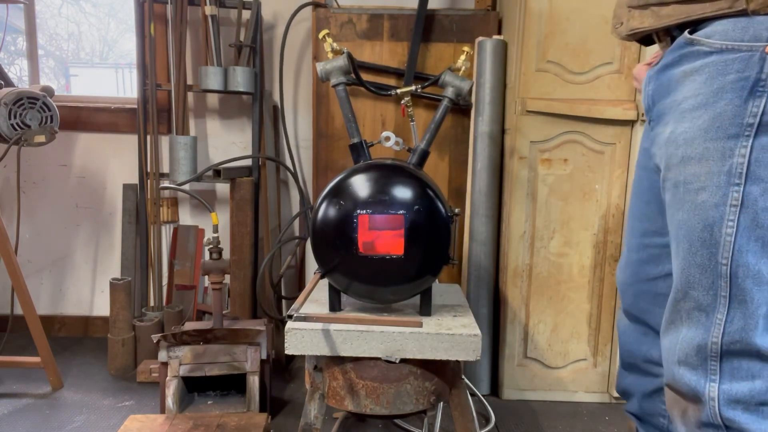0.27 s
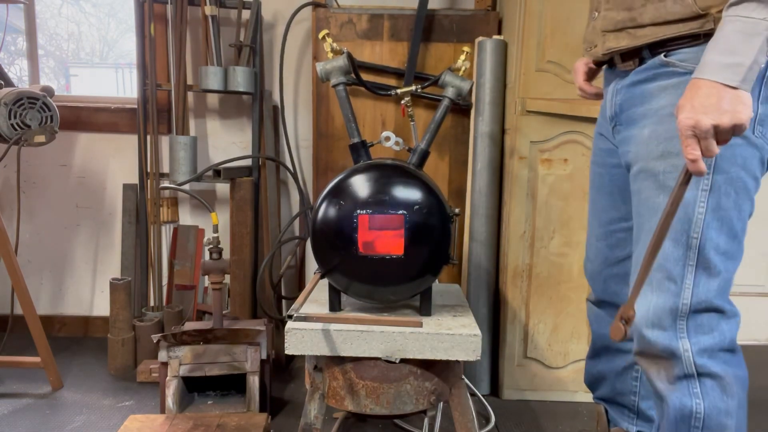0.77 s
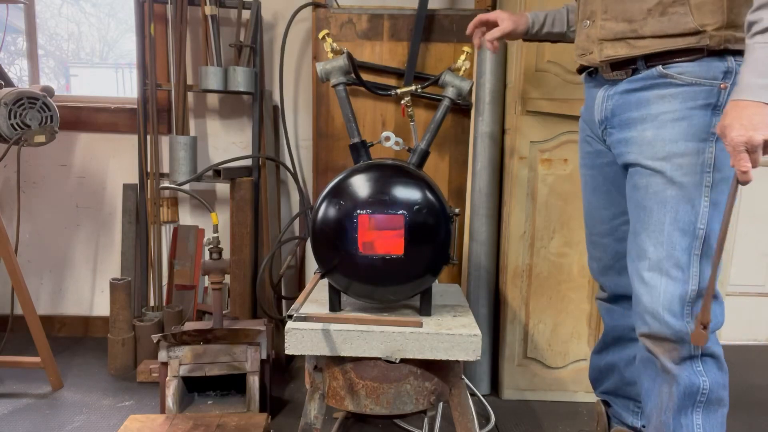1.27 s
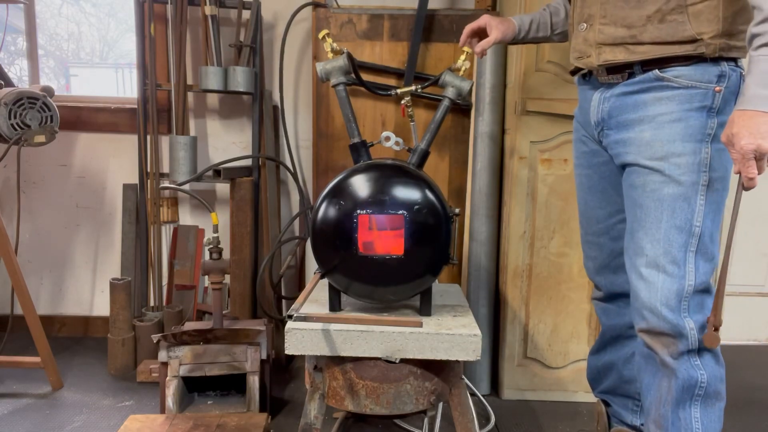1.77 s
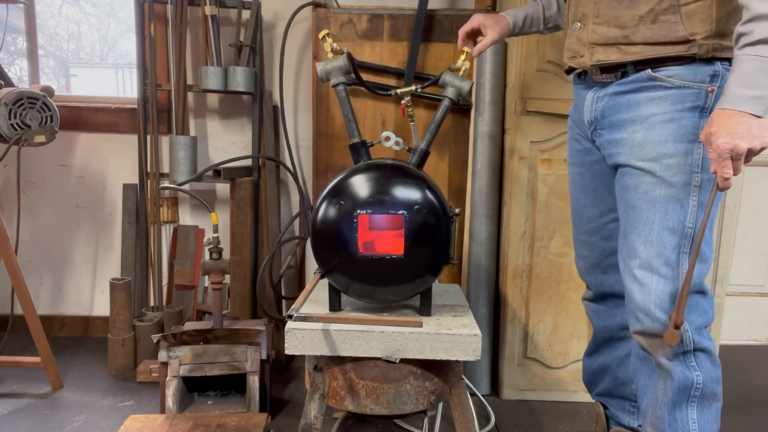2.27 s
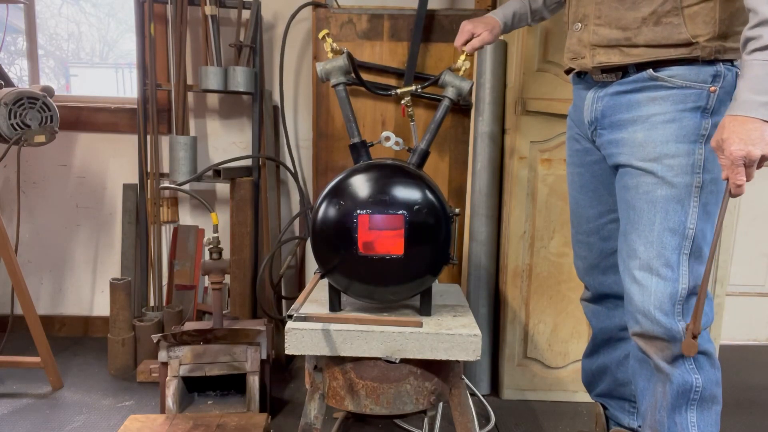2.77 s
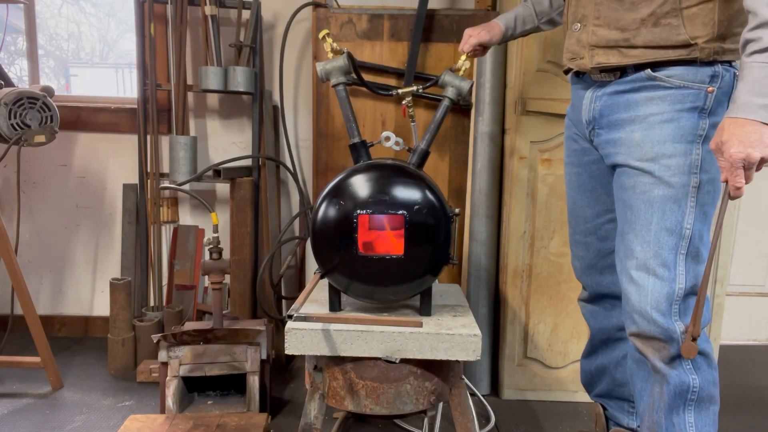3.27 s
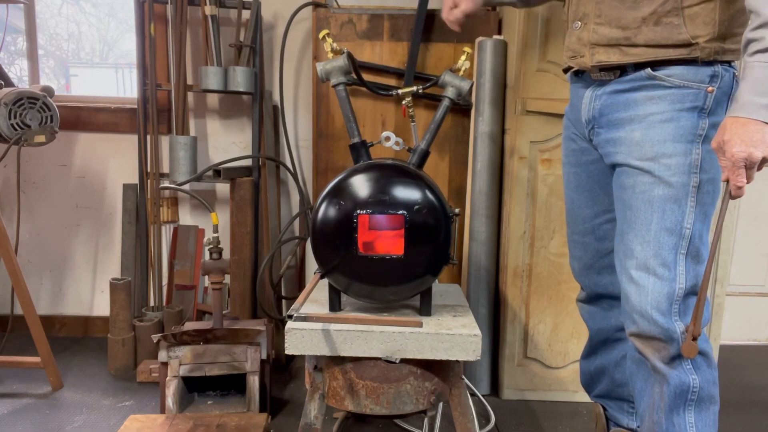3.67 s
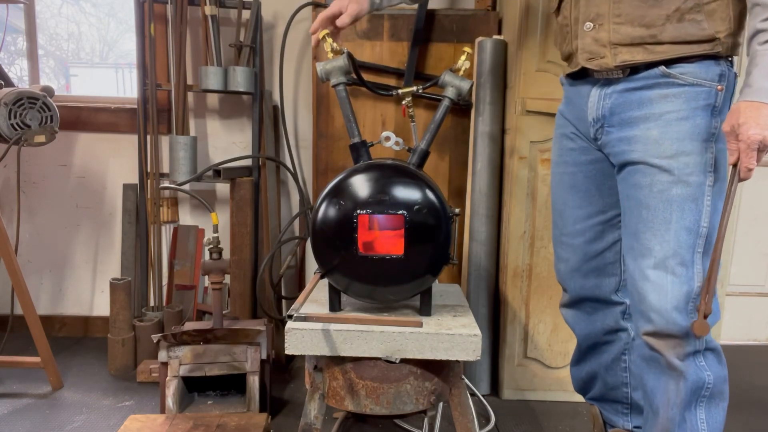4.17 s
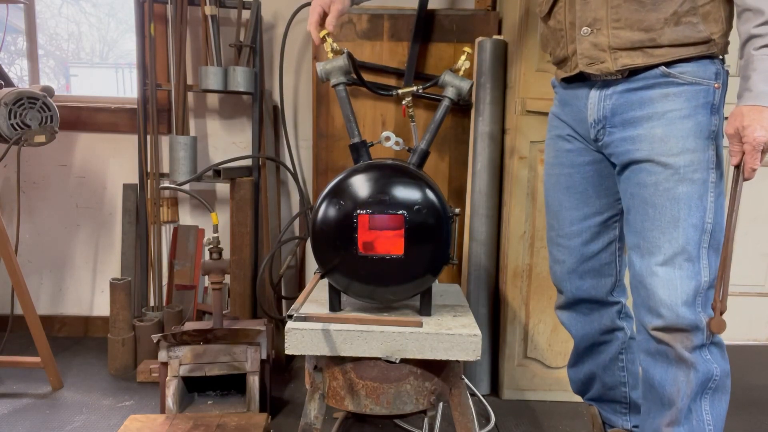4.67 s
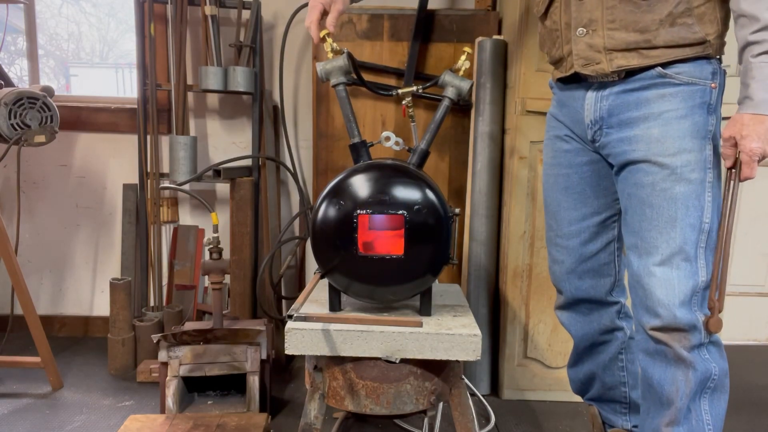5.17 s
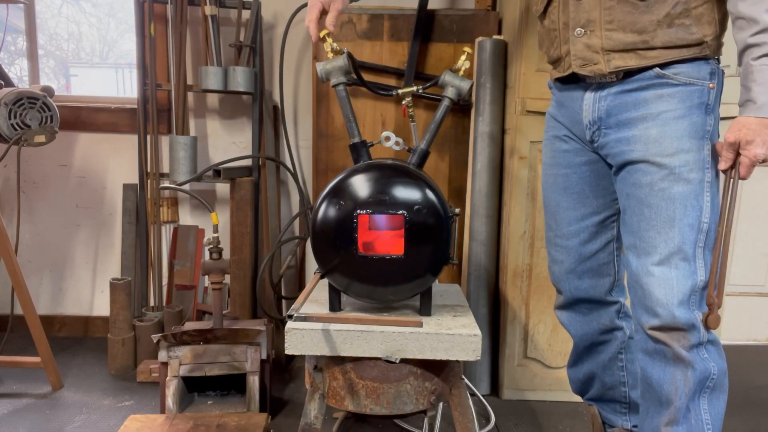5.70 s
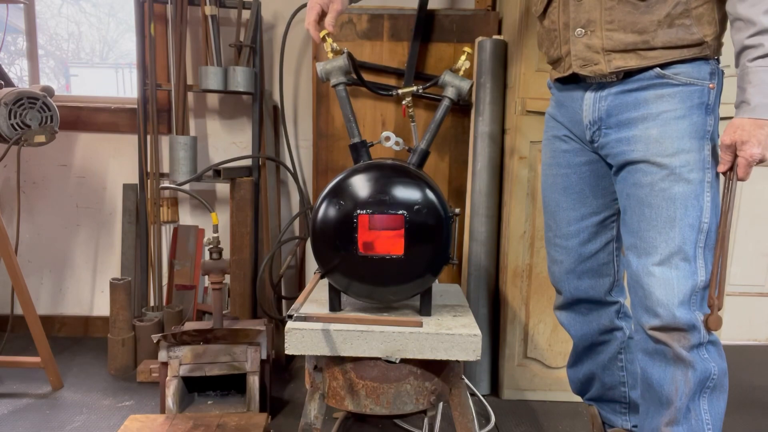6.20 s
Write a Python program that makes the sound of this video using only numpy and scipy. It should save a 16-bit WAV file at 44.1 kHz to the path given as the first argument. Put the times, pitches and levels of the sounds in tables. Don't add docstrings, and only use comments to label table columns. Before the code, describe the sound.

From 0 to about 6.4 seconds a two-burner gas forge burns without pause in a small workshop, heard close in stereo. The main sound is a deep, wide, fluttering roar, strongest between roughly 200 and 400 hertz, with little treble. It holds nearly level, but quick gusts and dips, each under a tenth of a second, make it wobble and puff. Much quieter above it are breathy tube resonances around 1.5 to 3.5 kilohertz and a fine, wide gas hiss. Brief, faint whistles appear near 1.6, 2.5 and 2.65 seconds, then a low upward slide at 2.8. At 2.74 the tube tone changes suddenly as the right air choke turns; very faint high whistles follow at 3.7 and 4.3. Around 4.1 the left choke changes the colour again, and the hiss becomes slightly brighter and ringing. The roar fades slightly around 4 to 4.5, recovers, and continues to the end.

```python
import sys
import numpy as np
from scipy import signal
from scipy.fft import rfft, irfft, next_fast_len
from scipy.io import wavfile
from scipy.ndimage import uniform_filter1d

SR = 44100
rng = np.random.default_rng(int(sys.argv[2]) if len(sys.argv) > 2 else 0)


def makeup_ratio(level_db):
    decades = np.asarray(level_db, float) / 20
    return 10 ** decades


def pcm_store(signal):
    levels = np.round(np.clip(np.atleast_2d(signal), -1, 1) * 32767)
    wavfile.write(sys.argv[1], SR, levels.astype(np.int16).T)


N = 283915

# f/Hz, level/dB
TURBULENCE = [(25, -81), (45, -81), (100, -58.5), (330, -50.5), (600, -64.5), (1000, -84.5), (1300, -108)]
# f/Hz, width/Hz, signed share at left port, at right port
ROOM_MODES = [(47.7, 7.2, 1.66, 1.6), (66.0, 9.6, 0.36, 0.55), (103.6, 18, -1.13, -1.1),
              (129.1, 13, -1.56, -1.28), (142.8, 14.4, 1.35, 1.7), (166.7, 22.5, 0.62, 0.3),
              (233.7, 21.7, 4.5, 4.5), (240.14, 62.1, -4.5, -4.5), (254.8, 48.5, 3, 3),
              (282.5, 13.8, -0.49, -1.48), (314.2, 29.4, 2, 1.87), (336.9, 9.4, -2, -1.37),
              (350, 13, -0.82, -0.4), (368.8, 21.3, -0.59, -0.64), (405.9, 16, 1, 2.5),
              (411, 27.8, -0.35, -3), (444.7, 22, 1.05, 0.92), (471, 28.2, -1.26, -0.64),
              (501, 38, -1.5, -0.36), (528.3, 61, 5, 2.5), (531, 34.7, -4.5, -3), (551.7, 25, -1.35, -0.36),
              (627.4, 34.5, -1.27, -1.04), (635, 55, 1.38, 1.19), (716, 9.1, 0.26, 0.35),
              (766.6, 35, 0, 1.6), (813.2, 16.7, -6, -2.5), (810.8, 40, 3.5, -0.1), (884, 19, 1, 1),
              (921, 43, 0.42, 2)]
# f/Hz, level/dB
SPREAD = [(24, -70), (40, -36), (179, -15.5), (226, 6.5), (275, -2), (307, 7.5), (423, -7.5), (466, -16),
          (716, -20), (811, -14), (1100, -36), (1430, -70), (2420, -120)]
RANGE_EDGES = [170, 255, 420, 700]
# level/dB against flame strength, share of its changes followed, share of air followed
RANGES = [(-10, 0.36, -0.065), (-7, 1, -0.49), (-2.5, 1.1, 0.078), (-13.5, .6, 0.88), (-29.5, 0.27, -0.24)]
# t/s, level/dB
FIRE = [
    (0.0, -26),
    (0.66, -27.5),
    (0.7, -25),
    (0.88, -26.5),
    (3.98, -28),
    (4.46, -26),
    (5.18, -27.5),
    (5.61, -25.5),
    (5.67, -27.5),
    (6.44, -26),
]
# t/s,
# level/dB
AIR = [(0, 0.5), (.8, .3), (1.3, 1.6), (2.1, 2.5), (2.55, 3.5), (2.7, 0.9), (3.6, -1.6), (4.4, 0.2),
       (5.2, -1.5), (6.0, -2.3), (6.44, 0.7)]
# t/s, nearby f/Hz, level/dB
FLARES = [(.02, 330, 7.5), (.59, 230, 4), (.72, 230, 5.5), (.72, 130, 2.5), (.82, 230, 3), (.82, 130, 4),
          (.91, 130, 4), (1.24, 230, 5), (1.38, 130, 4), (1.45, 230, 8), (2.06, 130, 6.5), (2.17, 520, 2),
          (2.4, 330, 8), (2.63, 130, 3), (3.26, 330, 5), (3.32, 130, 3), (3.51, 130, 2.5), (3.57, 230, 4),
          (4.25, 230, 6), (4.34, 330, 3), (4.43, 230, 6), (4.48, 130, 3), (4.7, 330, 3.5), (4.82, 230, 2.5),
          (5.12, 130, 5), (5.15, 230, 5), (5.29, 230, 4), (5.45, 230, 4), (5.81, 230, 6), (6.22, 330, 2)]
# t/s, nearby f/Hz, level/dB
LULLS = [(.01, 230, -11), (.54, 230, -6), (.66, 130, -2), (.77, 230, -7), (.88, 130, -7), (.97, 230, -10),
         (1.38, 330, -4), (1.67, 230, 1), (2.17, 330, -2), (2.3, 130, 0), (2.54, 130, -10),
         (2.63, 520, -2.5), (3.06, 230, -10), (3.17, 520, -2.5), (3.26, 130, -5), (3.32, 330, -3.5),
         (3.51, 230, -5), (3.57, 130, -1), (4.25, 330, -4), (4.34, 230, -6), (4.65, 130, -5),
         (4.72, 230, -9), (4.96, 330, -5.5), (5.15, 330, -2), (5.22, 130, -5), (5.61, 130, -4.5),
         (5.74, 330, -6.5), (5.87, 330, -2.5), (5.99, 330, -7.5), (6.22, 130, -5)]
# from t/s, to t/s
CHOKE_TURNS = [
    (2.74, 2.74),
    (4.1, 4.2),
]
# f/Hz, width/Hz, level/dB at first, level/dB after right choke, level/dB after left choke
TUBE_MODES = [(1000, 160, -15, -29, -35), (1215, 130, -14.5, -21, -17), (1388, 74, -13, -6, -5),
              (1462, 71, -1.5, -2.5, .8), (1560, 80, -8, -3, -6.5), (1880, 83, -3, -7.5, -4),
              (1992, 173, -5, -8, -7), (2435, 80, -4, 1.2, .2), (2580, 120, -9.5, -11, -12),
              (2870, 73, -18, -12, -10), (2985, 67, -7.5, -8.5, -8), (3055, 110, -6, -13, -13),
              (3174, 41, -9.5, -8.5, -5.5),
              (3545, 110, -6.5, -17, -10.5), (3620, 80, -14.5, -9, -8.5), (3710, 57, -7, -19, -22),
              (4100, 80, -15, -30, -19), (4235, 110, -11, -15, -11), (4930, 74, -13.5, -16, -13),
              (5100, 80, -23, -23, -31), (5640, 77, -21, -27, -12.5), (5700, 110, -18.5, -17.5, -18.5),
              (6200, 120, -24, -20, -20), (6420, 120, -16, -22, -17.5), (7060, 60, -24, -29, -27),
              (6960, 50, -18, -25, -22)]
# t/s, length/s, from f/Hz, to f/Hz, level/dB
WHISTLES = [
    (1.56, 0.06, 1875, 1895, -54),
    (2.52, 0.043, 1850, 1840, -56),
    (2.635, 0.066, 1870, 1870, -51.5),
    (2.776, 0.048, 1085, 1250, -61.5),
    (3.66, .12, 4915, 4925, -67),
    (3.66, .09, 5700, 5700, -72),
    (4.26, 0.11, 4930, 4925, -69),
]
# f/Hz, level/dB
HISS = [(600, -15), (1100, 2.5), (2500, 8), (4000, 7), (5500, 1.5), (6700, 0), (7900, 4), (9000, 3),
        (12000, -1.5), (14500, -1.5), (16000, -5.5)]
# f/Hz, likeness 0-1, lead of the right port/rad
PORTS = [(1000, .5, 0), (4000, .3, 1.2), (5300, .3, 3), (6500, .45, 3.1), (7100, .83, 3.1), (8000, .82, 3),
         (8800, .74, 2.2), (9600, .75, 1.4), (10400, .82, .7), (11100, .95, .15), (13400, .97, -.1),
         (14000, .82, -.6), (15000, .62, -1.7), (15800, .5, -2.7)]
# f/Hz, width/Hz, level/dB
NOZZLE = [(9140, 250, 2), (9500, 230, 3), (12550, 410, 4)]

FIRE_MEAN_DB = -27
FLARE_S, LULL_S = 0.035, 0.042


def flame():
    size = next_fast_len(N)
    f = np.fft.rfftfreq(size, 1 / SR)
    turbulence, other = rfft(rng.standard_normal((2, size)))

    hz, width, left, right = np.transpose(ROOM_MODES)
    low = f[f < 1500, None]
    modes = 1j * low * width / (hz ** 2 - low ** 2 + 1j * low * width)
    heard = np.zeros((2, len(f)), complex)
    heard[:, :len(low)] = [modes @ left - 0.02, modes @ right - 0.02]
    heard *= turbulence * makeup_ratio(read(TURBULENCE, f))
    heard[0] *= np.exp(-2j * np.pi * f * 4.1 / SR)
    heard /= np.sqrt(np.mean(abs(heard) ** 2))

    unlike = other * makeup_ratio(read(SPREAD, f))
    unlike /= np.sqrt(np.mean(abs(unlike) ** 2))
    heard += makeup_ratio(-15) * unlike * [[1], [-1]]

    below = [0] + [1 / (1 + (f / edge) ** 16) for edge in RANGE_EDGES] + [1]
    roar = np.zeros((2, N))
    for k in range(len(RANGES)):
        part = irfft(heard * (below[k + 1] - below[k]), size)[:, :N]
        roar += makeup_ratio(swell(k)) * steadied(part, 0.17)
    return roar


def swell(count):
    offset_db, fire, air = RANGES[count]
    steady = FIRE_MEAN_DB + offset_db + fire * (along(FIRE) - FIRE_MEAN_DB) + air * along(AIR)
    return steady + bumps(FLARES, FLARE_S, count) + bumps(LULLS, LULL_S, count)


def bumps(rows, half_s, count):
    t = np.arange(0, N + 256, 256) / SR
    s, hz, db = np.transpose(rows)
    mine = np.searchsorted(RANGE_EDGES, hz) == count
    bells = np.exp(-((t[:, None] - s) / half_s) ** 2)
    return np.interp(np.arange(N) / SR, t, bells @ (db * mine))


def tubes():
    frames, f = N // 256 + 9, np.fft.rfftfreq(2048, 1 / SR)
    t = np.arange(frames)[:, None] * 256 / SR
    hz, width, first, second, third = np.transpose(np.array(TUBE_MODES))
    right, left = (np.clip((t - a) / (b - a), 0, 1) for a, b in CHOKE_TURNS)
    level_db = first + right * (second - first) + left * (third - second)
    flutter = np.clip(drift(level_db.shape, size=9), -3, 2)
    level_db = level_db + (2.0 + hz / 5000) * flutter
    peaks = 1 / (1 + (2 * (f - hz[:, None]) / width[:, None]) ** 2) ** 1.36
    a, b = rng.standard_normal((2, frames, len(f)))
    z = (a + 1j * b) * np.sqrt(makeup_ratio(2 * level_db) @ peaks)
    song = signal.istft(z.T, nperseg=2048, noverlap=1792)[1][:N]
    return makeup_ratio(-55.5) * evened(song)


def whistles():
    out = np.zeros(N)
    for s, length, from_hz, to_hz, db in WHISTLES:
        hz = np.linspace(from_hz, to_hz, int(length * SR))
        tone = np.sin(2 * np.pi * np.cumsum(hz) / SR) * signal.windows.tukey(len(hz), 0.6)
        out[int(s * SR):][:len(hz)] += makeup_ratio(db + 5.5) * tone
    return out


def jets():
    frames, f = N // 128 + 5, np.fft.rfftfreq(512, 1 / SR)
    a, b, c, d = rng.standard_normal((4, frames, len(f)))
    patches = evened(uniform_filter1d(drift((frames, len(f)), size=14), size=9, axis=1))
    flicker = drift((frames, 1), size=12)

    same = np.clip(read(PORTS, f), 0, 1)
    lead = np.exp(1j * read(PORTS, f, column=2))
    left = a + 1j * b
    right = same * left * lead + np.sqrt(1 - same ** 2) * (c + 1j * d)
    z = np.array([left, right]) * makeup_ratio(read(HISS, f) + 1.1 * patches + 0.25 * flicker)

    t = np.arange(frames)[:, None] * 128 / SR
    turned = np.clip((t - CHOKE_TURNS[1][0]) / 0.25, 0, 1)
    ring_db = sum(db / (1 + (2 * (f - hz) / width) ** 2) for hz, width, db in NOZZLE)
    z *= makeup_ratio(turned * ring_db)
    hiss = signal.istft(z.transpose(0, 2, 1), nperseg=512, noverlap=384)[1][:, :N]

    opened = np.clip((np.arange(N) / SR - CHOKE_TURNS[0][1]) / 1.0, 0, 1)
    return makeup_ratio(-55 + 0.66 * opened) * evened(hiss)


def workshop(x, t60=0.3, wet_db=-3, lag=2.27):
    taps = np.zeros((2, SR // 2))
    at = np.arange(100, SR // 2 - 20, 20)
    at = at + rng.integers(0, 20, (2, len(at)))
    np.put_along_axis(taps, at, rng.choice([-1., 1.], at.shape), 1)
    taps *= makeup_ratio(-60 * np.arange(SR // 2) / SR / t60)
    taps = signal.lfilter([1], [1, -0.75], taps)
    taps *= makeup_ratio(wet_db) / np.linalg.norm(taps[0])
    taps[:, :64] += np.sinc(np.arange(64) - 32 - np.array([[lag], [0]]))
    return signal.fftconvolve(x[None], taps, axes=1)[:, 32:N + 32]


def evened(x):
    return x / np.sqrt(np.mean(x ** 2) + 1e-20)


def read(points, hz, column=1):
    points = np.array(points)
    return np.interp(np.log(hz + 1), np.log(points[:, 0] + 1), points[:, column])


def along(rows, column=1):
    rows = np.array(rows)
    return np.interp(np.arange(N) / SR, rows[:, 0], rows[:, column])


def steadied(x, s):
    size = int(s * SR)
    power = uniform_filter1d(uniform_filter1d((x ** 2).mean(0), size), size)
    return x / np.sqrt(power + 1e-20)


def drift(shape, size):
    noise = rng.standard_normal(shape)
    return evened(uniform_filter1d(uniform_filter1d(noise, size, 0), size, 0))


def scene():
    singing = workshop(tubes()) + workshop(tubes())
    return flame() + singing + workshop(whistles(), wet_db=-15) + jets()


def low_pass(x):
    return signal.sosfilt(signal.butter(12, 15720, fs=SR, output="sos"), x)


def record(dry):
    return low_pass(dry)


dry = scene()
out = record(dry)
pcm_store(out)
```